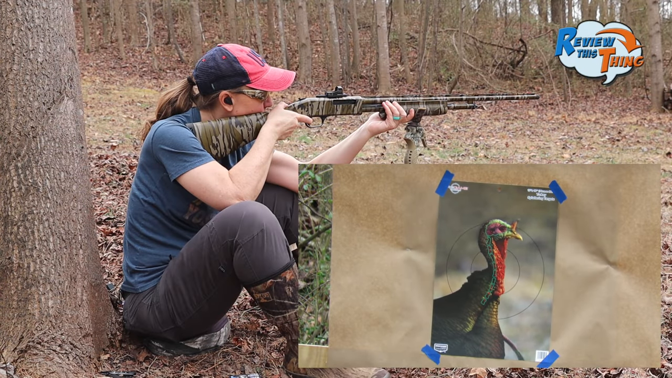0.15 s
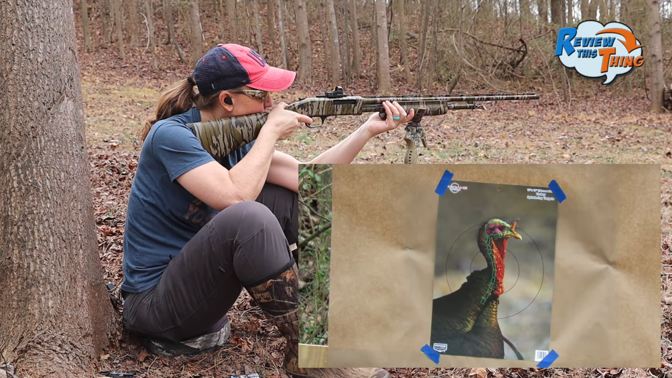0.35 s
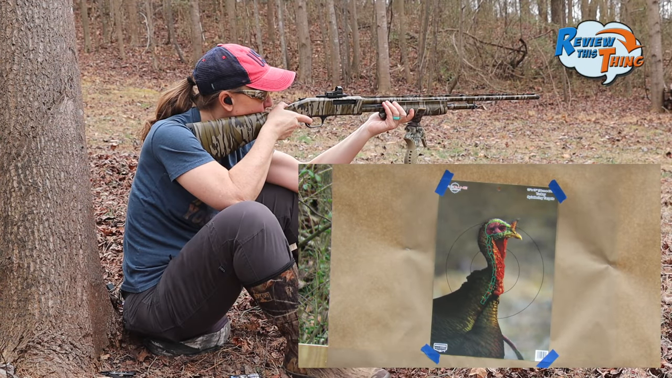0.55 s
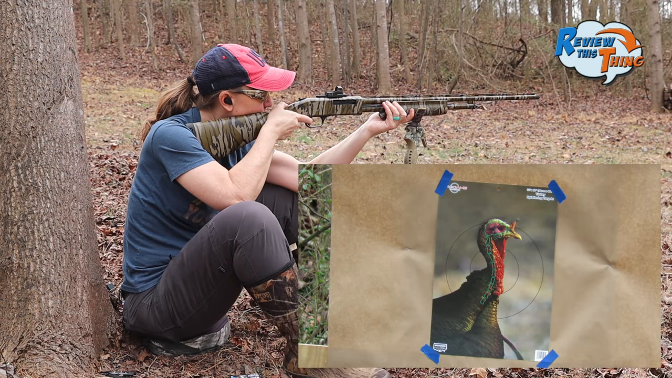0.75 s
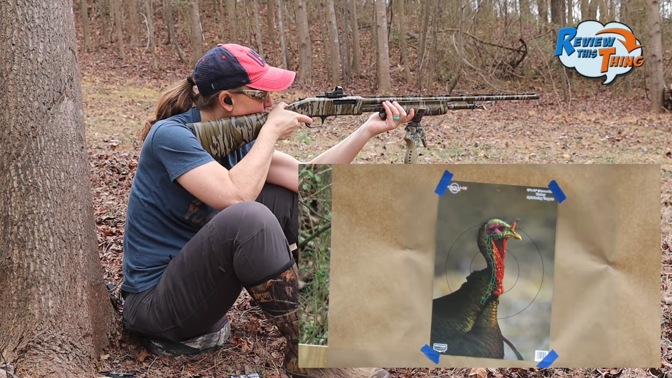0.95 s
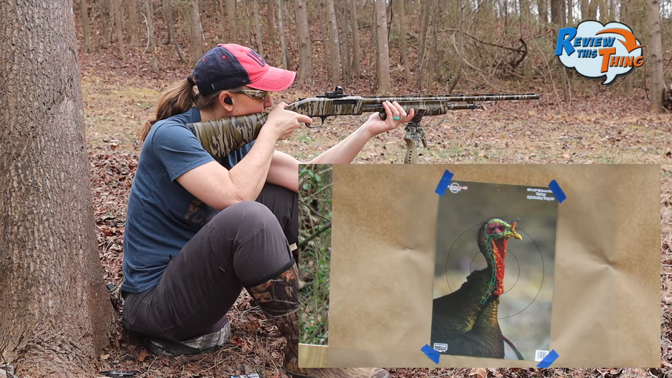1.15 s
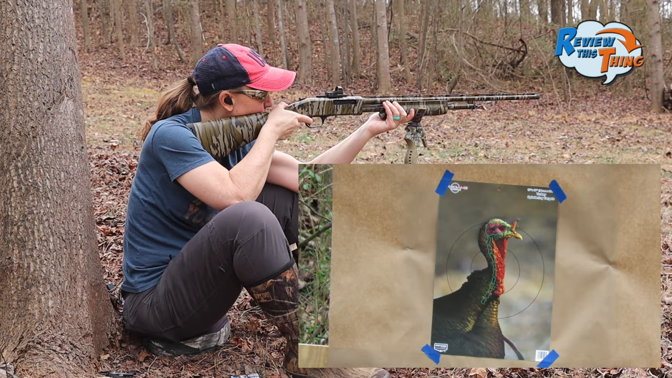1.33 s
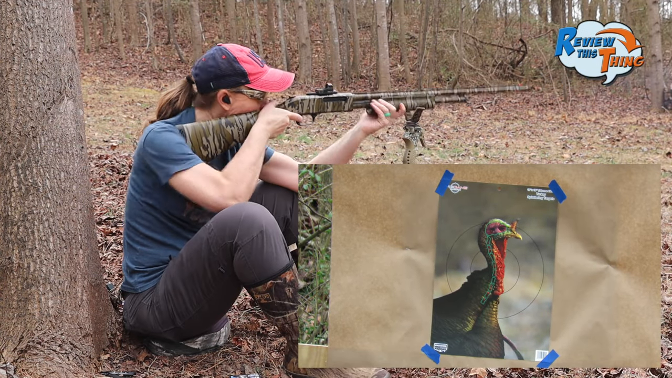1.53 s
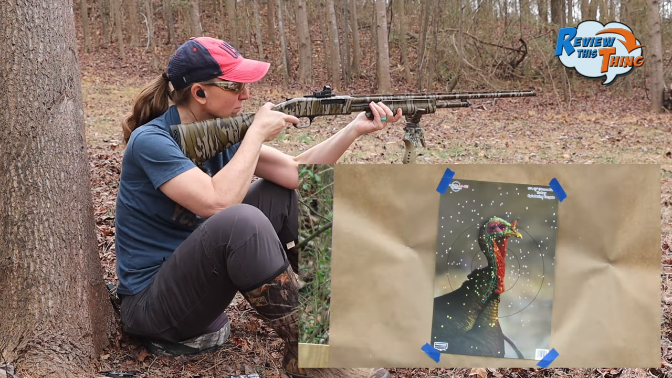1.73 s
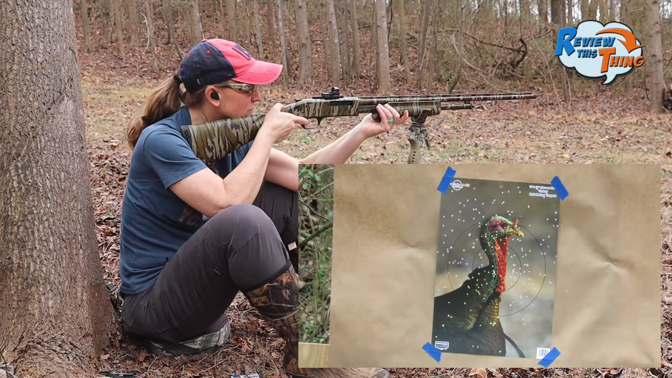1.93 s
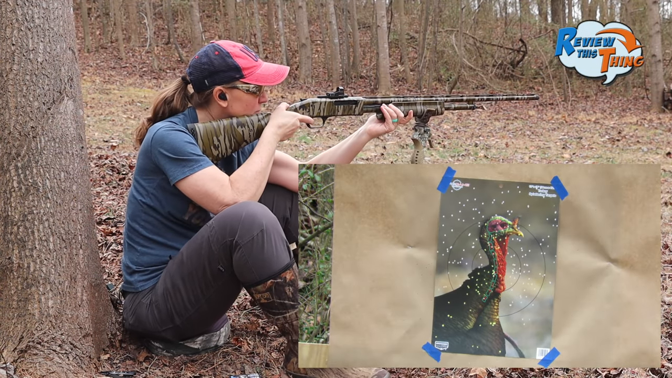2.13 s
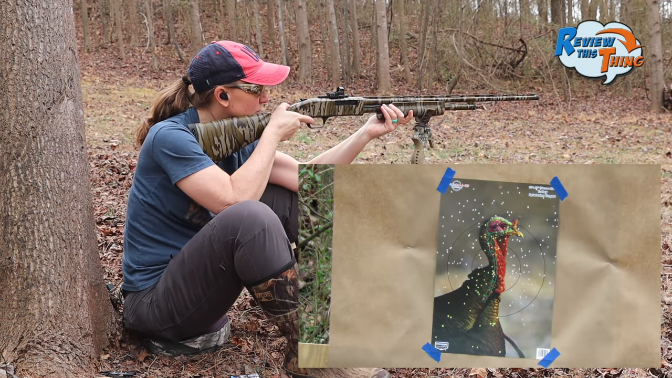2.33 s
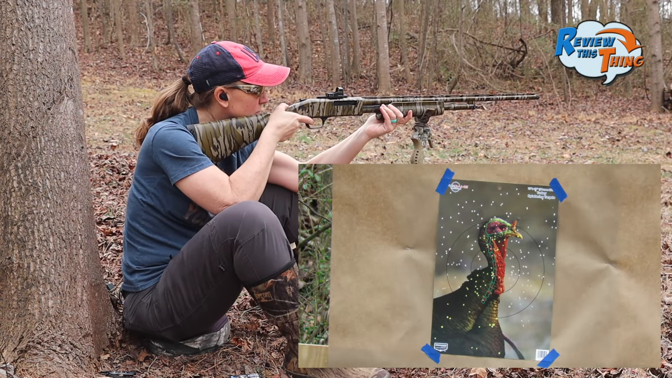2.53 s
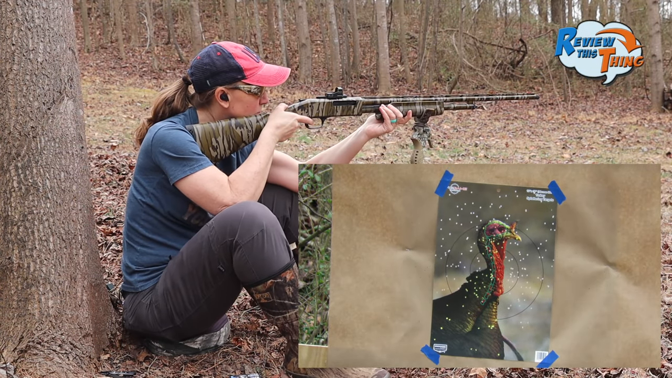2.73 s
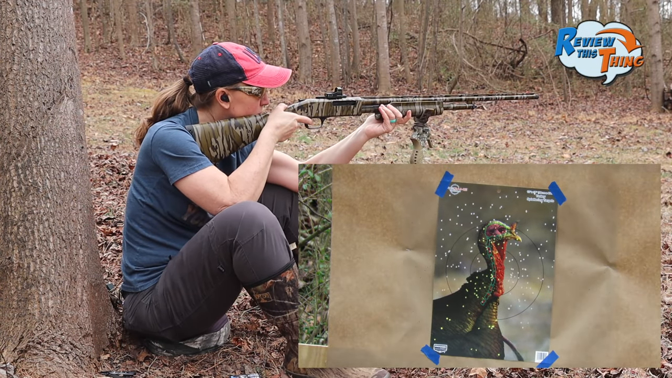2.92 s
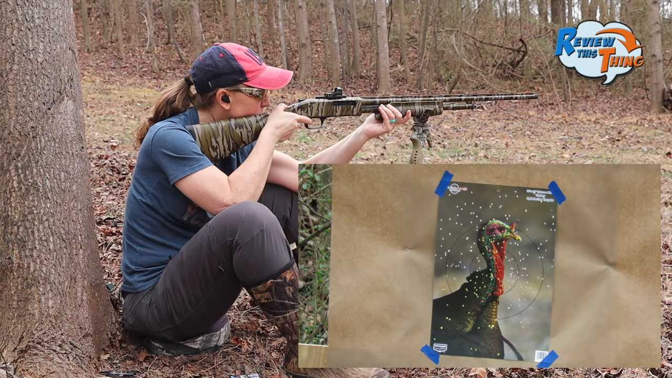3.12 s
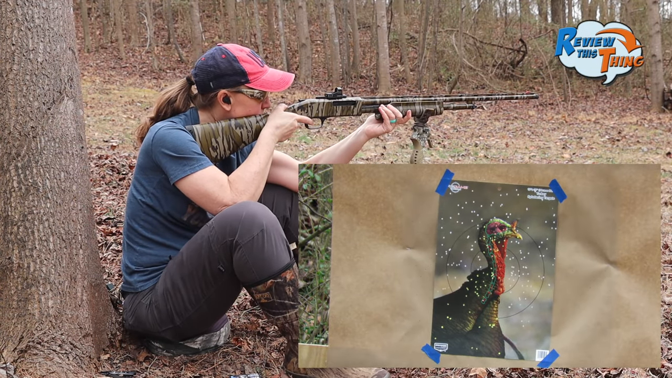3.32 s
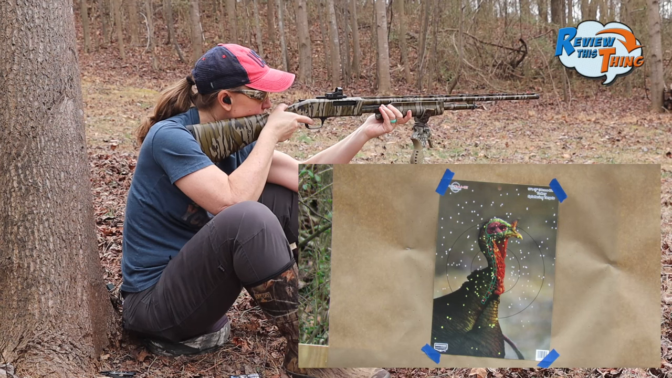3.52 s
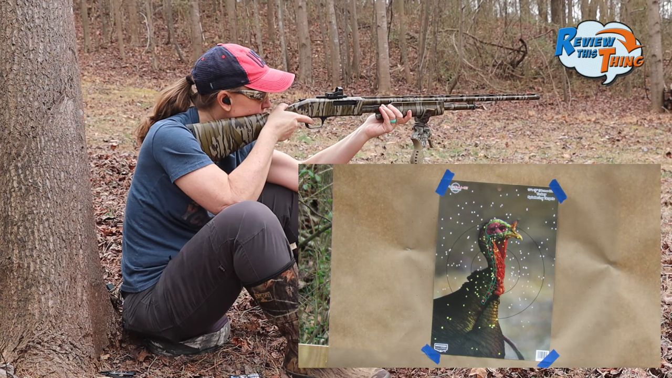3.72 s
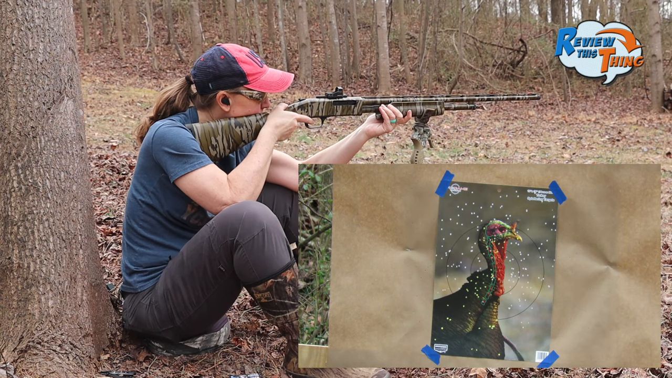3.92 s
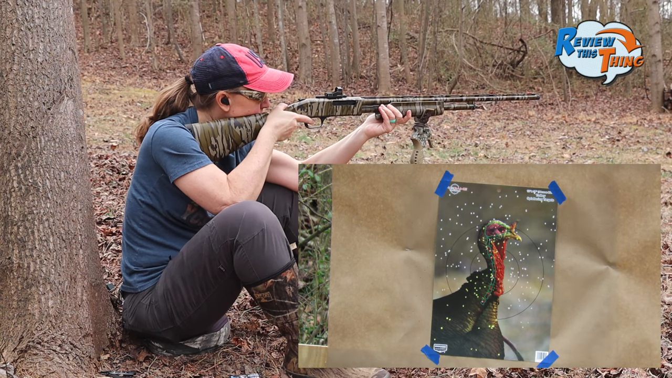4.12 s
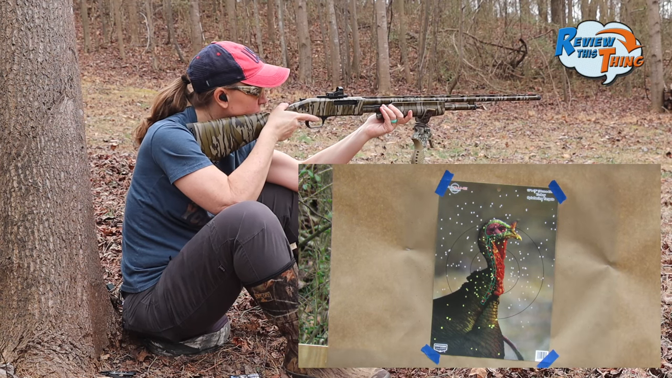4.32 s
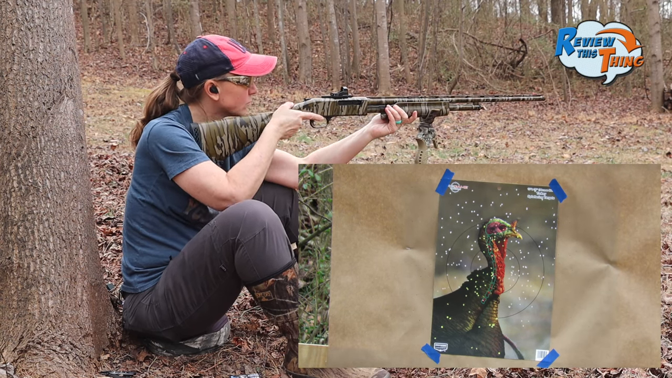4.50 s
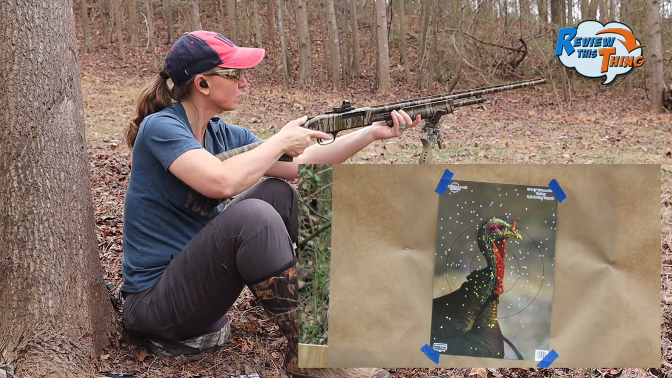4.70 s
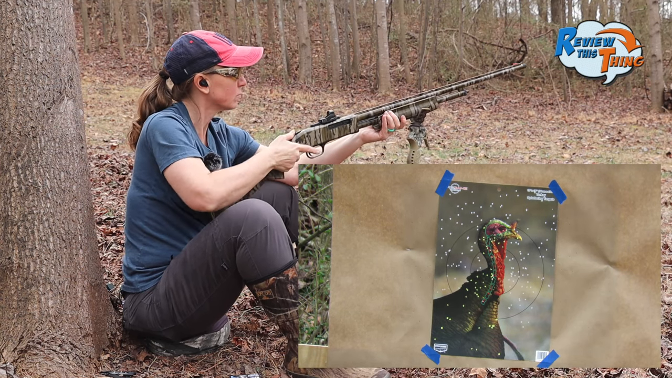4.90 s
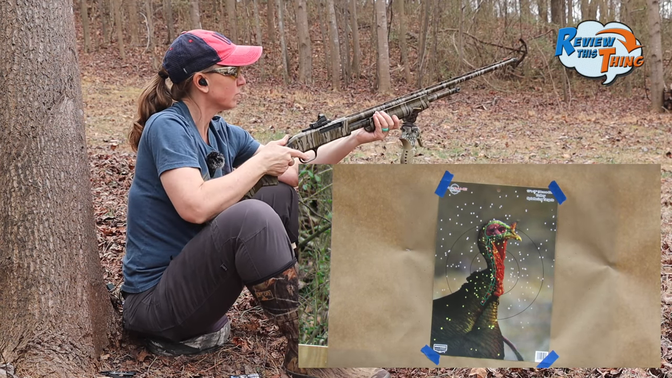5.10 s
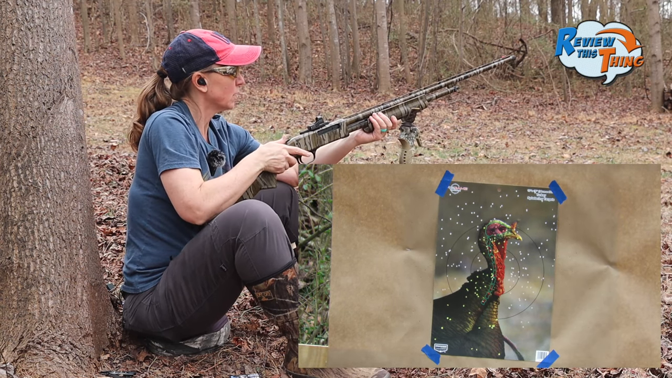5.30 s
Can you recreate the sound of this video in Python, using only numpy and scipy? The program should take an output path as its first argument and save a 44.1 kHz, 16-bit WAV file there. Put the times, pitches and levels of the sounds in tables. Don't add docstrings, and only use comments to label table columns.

```python
import sys
import numpy as np
from scipy import signal
from scipy.fft import rfft, irfft
from scipy.io import wavfile
from scipy.ndimage import uniform_filter1d

SR = 44100
rng = np.random.default_rng(int(sys.argv[2]) if len(sys.argv) > 2 else 0)


def volts_from_decibels(level):
    exponent = np.asarray(level, float) / 20
    return 10 ** exponent


def transcribe(u):
    v = np.clip(np.atleast_2d(u).T, -1, 1)
    q = np.round(v * 32767).astype(np.int16)
    wavfile.write(sys.argv[1], SR, q)


N = 235979
T = np.arange(N) / SR


def unit(x):
    return x / np.sqrt(np.mean(x ** 2))


def shade(x, table):
    hz, db = np.transpose(table)
    f = np.maximum(np.arange(len(x) // 2 + 1) * SR / len(x), 1)
    gain = volts_from_decibels(np.interp(np.log(f), np.log(hz), db))
    return irfft(rfft(x) * gain, len(x))


def band(count, hz, width):
    f = np.arange(count // 2 + 1) * SR / count
    bell = np.exp(-(2 * (f - hz) / width) ** 2)
    return unit(irfft(rfft(rng.standard_normal(count)) * bell, count))


def walk(rate):
    hold = int(SR / rate)
    steps = np.repeat(rng.standard_normal(N // hold + 1), hold)[:N]
    return unit(uniform_filter1d(steps, hold))


def add(out, s, x):
    i = int(s * SR)
    out[i:i + len(x)] += x[:N - i]


def bursts(table):
    out = np.zeros(N)
    for s, db, hz, width, ms in table:
        u = np.arange(8192) / SR / (ms / 1000)
        envelope = 6 * u * np.exp(-2.5 * u - u ** 3)
        add(out, s, volts_from_decibels(db) * envelope * band(count=8192, hz=hz, width=width))
    return out


def small_radiator(x):
    return shade(x, [(500, -25), (900, 1.5)])


# f/Hz, level/dB per Hz
HUSH_SPECTRUM = [(35, -44.5), (60, -7.5), (64, -5.5), (227, -3), (268, -7.5), (427, -10), (527, -17.5),
                 (698, -7), (946, -3.5), (4120, -33), (7750, -39.5), (14600, -37.5), (16000, -48)]
# t/s, level/dB
TYRE_DRIFT = [
    (0, 3.5),
    (.9, 1),
    (1.3, 0),
    (2.5, 4.5),
    (3.0, 0.5),
    (3.6, 1.5),
    (4.3, 0),
    (5.0, 4),
    (5.35, 5),
]


def hush():
    steady = unit(shade(rng.standard_normal(N), HUSH_SPECTRUM))
    rumble = shade(steady, [(300, 0), (450, -60)])
    tyres = shade(steady, [(900, -59.0), (1300, 0.5), (3200, -2), (5000, -33.0)])
    rumble_gain = volts_from_decibels(1.87 - 0.7 * T)
    tyre_gain = volts_from_decibels(np.interp(T, *np.transpose(TYRE_DRIFT)))
    swell = rumble * (rumble_gain - 1) + tyres * (tyre_gain - 1)
    road = shade(steady + swell, [(14900, 0), (15300, -14.5)])
    whine = volts_from_decibels(-51.5) * band(count=N, hz=8280, width=120)
    rustle = volts_from_decibels(-16) * np.exp(-((T - 5.26) / .09) ** 2) * band(count=N, hz=2704, width=730)
    return volts_from_decibels(-67 + 0.54 * walk(1.3)) * (road + whine + rustle)


# t/s, level/dB, f/Hz
ENGINE_TONE = [(0.0, -52.5, 27.8), (0.2, -52, 32.16), (0.45, -60.5, 31.3), (0.6, -51.5, 31.65),
               (0.9, -59.5, 32), (1.03, -58.5, 34.5), (1.15, -52, 33.85), (1.401, -53.5, 31.7),
               (1.7, -62, 32), (1.85, -55.5, 31.16), (2.25, -55.5, 31.67), (2.72, -53, 33.24),
               (2.93, -54.5, 30.3), (3.29, -51.5, 30.2), (3.5, -59, 30.4), (3.77, -55.5, 30.32),
               (4.8, -54, 30.22), (5.35, -56, 32)]
# t/s, depth/dB
ENGINE_FADES = [(0.06, 10), (0.155, 12), (0.5, 8), (0.93, 6), (1.0, 6.5), (1.08, 11), (1.235, 20),
                (1.34, 8.5), (2.04, 7), (2.2, 7.5), (2.34, 11.5), (2.45, 13.5), (2.57, 11.5), (2.66, 9.5),
                (2.85, 14.5), (3.235, 10.5), (3.525, 11), (3.92, 14), (4.03, 7.5), (4.33, 7), (4.45, 6),
                (4.71, 13), (5.11, 18)]


def throb():
    fade_half_s = .055
    s, db, hz = np.transpose(ENGINE_TONE)
    fade_db = sum(depth_db * np.maximum(1 - abs(T - at) / fade_half_s, 0) for at, depth_db in ENGINE_FADES)
    phase = 2 * np.pi * np.cumsum(np.interp(T, s, hz)) / SR
    tone = np.sqrt(2) * volts_from_decibels(np.interp(T, s, db) - fade_db) * np.sin(phase)
    return tone + volts_from_decibels(-69) * band(count=N, hz=35.94, width=26)


# t/s, level/dB, folds (radians per rms of swing)
BLAST_FOLDS = [
    (1.5985, -57.5, 3.7),
    (1.601, -37.5, 7),
    (1.6052, -49, 3.6),
    (1.6058, -25, 11.38),
    (1.617, -29, 7.5),
    (1.637, -35, 4),
    (1.640, -42, 3.5),
    (1.660, -41, 5.32),
    (1.668, -34, 1.24),
]
# f/Hz, level/dB
STAGE_COLOUR = [(50, -14), (130, -3), (320, 0), (560, -5), (1150, 0), (2200, -3), (3300, -5.5), (5600, 0.5),
                (7500, -3), (10000, -6), (12500, -1.5), (15000, -3), (16500, -30)]


def blast():
    release_s, release_db_per_ms = .012, 3.5
    fizz_start_db, fizz_tilt_db_per_ms, fizz_under_db = -35.5, -0.0261, 4
    sided_from_s, sided_rise_s, sided_share = 1.612, 0.0077, .65
    s, db, folds = np.transpose(BLAST_FOLDS)
    t = T[int(s[0] * SR):int((s[-1] + release_s) * SR)]
    peak_s = s[np.argmax(db)]
    db = np.interp(t, s, db) - release_db_per_ms * 1000 * np.maximum(t - s[-1], 0)
    folds = np.interp(t, s, folds)
    fizz_db = fizz_start_db - fizz_tilt_db_per_ms * 1000 * (t - peak_s) - db
    fizz_db = np.minimum(fizz_db, -fizz_under_db) - 8 * (folds < 1.5)
    fizz = volts_from_decibels(fizz_db) * band(count=len(t), hz=9000, width=30000)
    swing = band(count=len(t), hz=545.0, width=900) + 0.076 * band(count=len(t), hz=3000, width=7400)
    folded = np.sin(folds * swing) + 0.295 * np.tanh(swing) + fizz
    gate = np.tanh(1.5 * np.maximum(swing + .25, 0))
    humps = 1.713 * gate * (1 + 0.63 * np.sin(3 * folds * swing) + fizz) - .8
    share = sided_share * np.clip((t - sided_from_s) / sided_rise_s, 0, 1)
    out = np.zeros(N)
    add(out, s[0], volts_from_decibels(db) * shade((1 - share) * folded + share * humps, STAGE_COLOUR))
    return volts_from_decibels(5.0) * out


# f/Hz, level/dB at the start, t60/s
NEAR_WASH = [(70, -75, 1.3), (142, -49.5, 1.84), (285, -40.5, 0.75), (560, -50.5, 1.9), (673, -47, 2.5),
             (870, -40, 3.46), (1088, -46.5, 1.85), (1550, -45, 1.76), (2650, -49.5, 1.61),
             (4450, -49.5, 1.45), (8000, -48, 0.8), (12000, -52, 0.64), (15500, -62, 0.62)]
# f/Hz, level/dB at the start, t60/s
FAR_WASH = [(70, -80.5, 2.0), (200.4, -56, 2.75), (400, -62.5, 3.8), (565.3, -61, 4.4), (720, -64, 2.6),
            (870, -55.5, 3.2), (1080, -67, 2.4), (1500, -68, 3), (2800, -64.5, 2.8), (5000, -65, 1.7),
            (8000, -73.5, 1.2), (15500, -95, 1.0)]


def wash():
    start_s = 1.694
    age = np.maximum(T - start_s, 0)
    clumps_db = 1.45 * walk(120) * np.exp(-age / 0.39)
    out = np.zeros(N)
    for hz in 60 * 2 ** np.arange(0, 8.1, 1 / 3):
        power = 0
        for table_hz, table_db, table_t60 in (np.transpose(NEAR_WASH), np.transpose(FAR_WASH)):
            db = np.interp(np.log(hz), np.log(table_hz), table_db)
            t60 = np.interp(np.log(hz), np.log(table_hz), table_t60)
            power = power + volts_from_decibels(db - 6 - 60 * age / t60) ** 2
        onset = np.minimum(age * hz / 9.2, 1)
        ragged = volts_from_decibels(clumps_db + 0.88 * walk(40))
        out += onset * np.sqrt(power) * ragged * band(count=N, hz=hz, width=hz / 3)
    return out * (T > start_s)


# centre t/s, peak level/dB, f/Hz, length/cycles
TRUNK_ECHOES = [(1.7135, -30, 320, 2.4), (1.7445, -35, 900, 2.3), (1.767, -40.5, 400, 1.7),
                (1.778, -40, 380, 1.6), (1.7885, -25.5, 860, 2.4), (1.7922, -32.5, 910, 3.6),
                (1.7975, -37, 362, 3), (1.8175, -36, 487, 1.5), (1.833, -43, 945, 4.4),
                (1.8715, -30, 815, 3.4), (1.8895, -31.5, 825, 3.4), (1.941, -36.5, 870, 3.36),
                (1.953, -38, 950, 3.7), (1.9875, -36.5, 898, 2.5), (2.010, -48, 820, 2.7),
                (2.040, -44.5, 767, 3.9), (2.066, -45, 870, 5.2), (2.132, -43.5, 890, 1.72),
                (2.198, -47, 880, 2.4), (2.216, -48, 890, 3.4), (2.315, -50, 845, 5.45)]


def echoes():
    out = np.zeros(N)
    for s, db, hz, cycles in TRUNK_ECHOES:
        reach = int(2 * cycles / hz * SR)
        u = np.arange(-reach, reach) * hz / SR
        side = np.where(u < 0, .8, 1.3)
        shape = np.exp(-(2 * u / (cycles * side)) ** 2)
        ring = np.sin(2 * np.pi * u) + 0.23 * np.sin(2 * np.pi * 1.86 * u)
        add(out, s + u[0] / hz, volts_from_decibels(db) * shape * ring)
    return out


# t/s, level/dB, centre f/Hz, width/Hz, length/ms
TRUNK_SLAPS = [(1.7095, -43, 4160, 1400, 7), (1.712, -38.5, 1210, 2000, 18), (1.743, -41, 1500, 2500, 9),
               (1.774, -43, 3600, 800, 1.6), (1.787, -45, 1700, 1500, 8.2),
               (1.815, -37.5, 3230, 4000, 2.62), (1.847, -51, 6760, 15900, 21),
               (1.847, -45, 2800, 1000, 11), (1.884, -54.5, 7000, 16000, 4.8), (2.128, -67, 5000, 8000, 10),
               (2.205, -58, 3000, 3000, 5), (2.439, -69, 4000, 5000, 4.6)]


def slaps():
    return small_radiator(bursts(TRUNK_SLAPS))


# t/s, level/dB, centre f/Hz, width/Hz, length/ms
ACTION_TICKS = [(4.393, -72.5, 9000, 13880, 4.1), (4.51, -81, 8000, 12000, 163),
                (4.599, -67, 3930, 14060, 35), (4.6045, -50.5, 5290, 1500, 2.3),
                (4.6046, -55, 9000, 14000, 2.9), (4.6105, -55, 5000, 3000, 3.7),
                (4.6116, -46.5, 5000, 16000, 4.57), (4.616, -59.5, 1990, 2500, 21),
                (4.621, -64, 6490, 4010, 3.4), (4.629, -58, 4000, 10000, 3.5),
                (4.6352, -51, 6200, 3000, 3.93), (4.6354, -59, 3300, 2500, 5.4),
                (4.707, -78.5, 9000, 5000, 1.9), (4.7166, -77, 6070, 5000, 2)]


def ticks():
    return small_radiator(bursts(ACTION_TICKS))


# f/Hz, level/dB, t60/s
RECEIVER_MODES = [(1070, 8.5, 0.012), (1400, 2.5, 0.015), (1616, -16, 0.0415), (2254, -14.5, 0.031),
                  (2730, -5, 0.016), (3700, -12, 0.013), (4420, -14, 0.013), (5350, -7, 0.011),
                  (9534, -16, 0.019), (11250, -10, 0.028), (14600, -8, .01)]


def catch():
    snap_s, snap_db, stop_s = 4.6108, -32.5, 0.02
    t = np.arange(4096) / SR
    ring = np.zeros(len(t))
    for hz, db, t60 in RECEIVER_MODES:
        ring += volts_from_decibels(db) * np.sin(2 * np.pi * hz * t) * np.exp(-np.log(1000) * t / t60)
    rise = 1 - np.exp(-(t / 0.001385) ** 2)
    thumb = np.exp(-(t / stop_s) ** 6)
    out = np.zeros(N)
    add(out, snap_s, volts_from_decibels(snap_db) * ring * rise * thumb)
    return small_radiator(out)


def scene():
    background = hush() + throb()
    shot = blast() + wash() + echoes() + slaps()
    return (background + shot + ticks() + catch())[None]


# t/s, level/dB (gain)
LIMITER_GAIN = [
    (1.600, -1),
    (1.672, -0.5),
    (1.683, -12.5),
    (1.693, -31),
    (1.698, -9.5),
    (1.712, -2.5),
    (1.76, 0),
]


def limiter(x):
    s, db = np.transpose(LIMITER_GAIN)
    return x * volts_from_decibels(np.interp(T, s, db))


def band_limit(x):
    return signal.sosfilt(signal.butter(12, 16480, fs=SR, output="sos"), x)


def record(dry):
    top_cut = signal.ellip(8, .2, 60, 16200, fs=SR, output="sos")
    mix = signal.sosfilt(top_cut, limiter(dry))
    return band_limit(mix)


dry = scene()
out = record(dry)
transcribe(out)
```